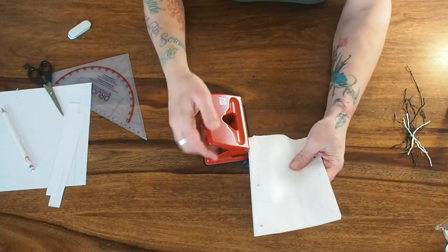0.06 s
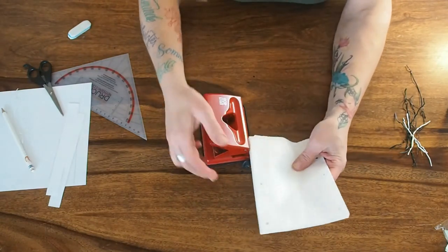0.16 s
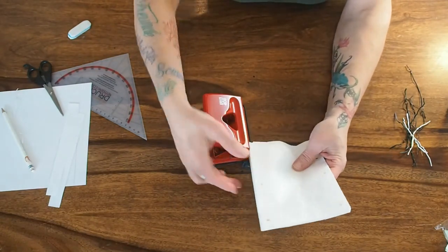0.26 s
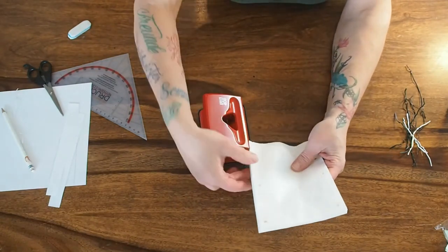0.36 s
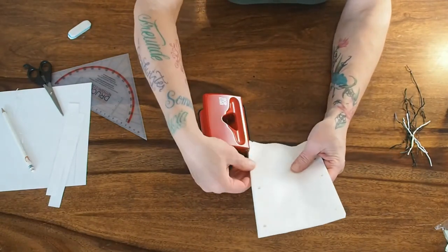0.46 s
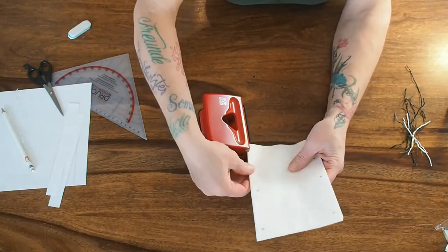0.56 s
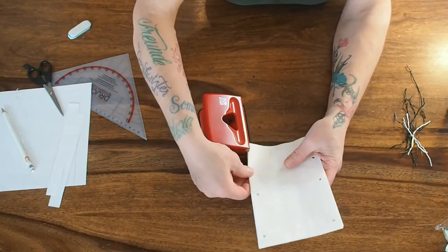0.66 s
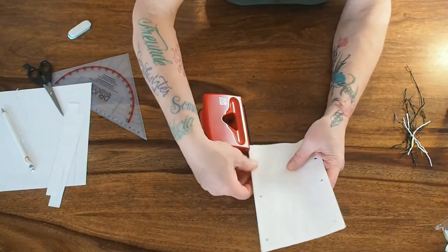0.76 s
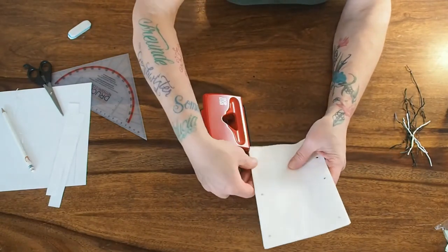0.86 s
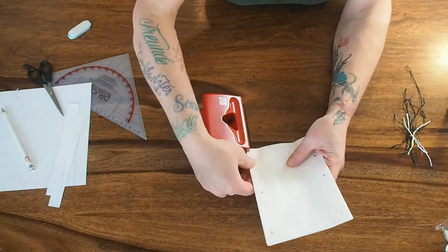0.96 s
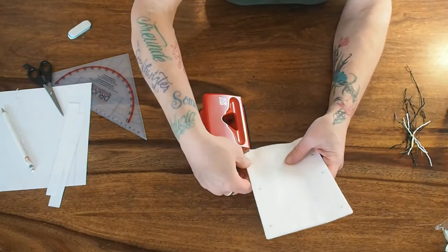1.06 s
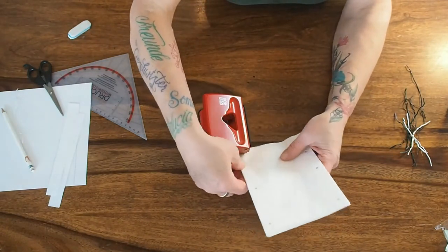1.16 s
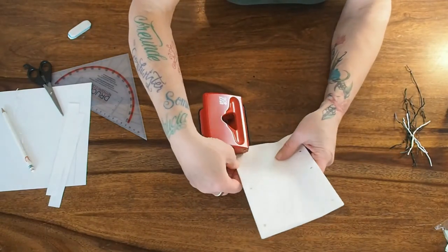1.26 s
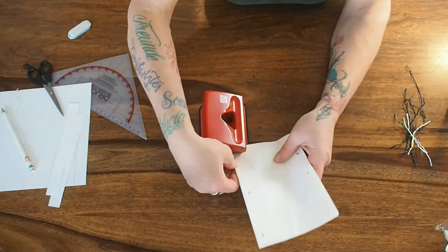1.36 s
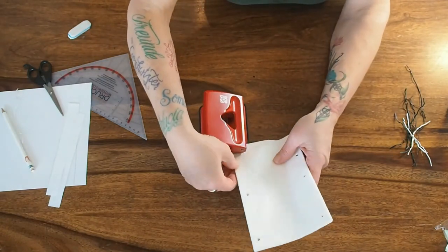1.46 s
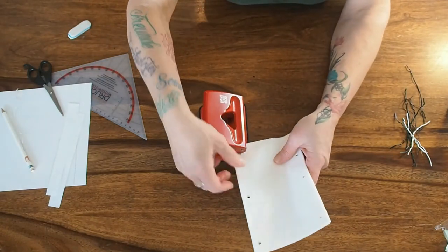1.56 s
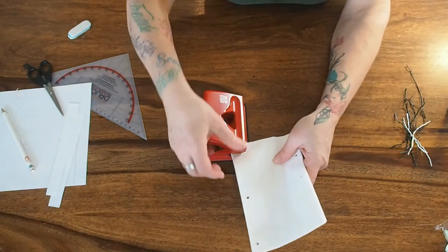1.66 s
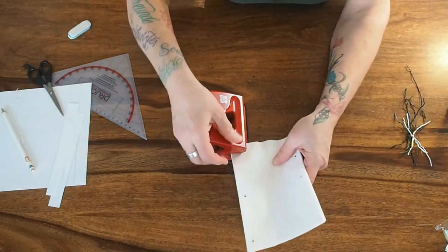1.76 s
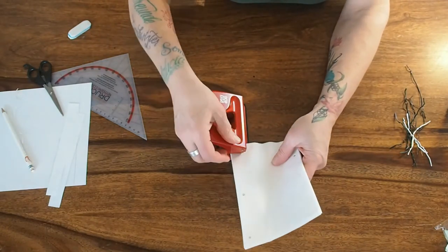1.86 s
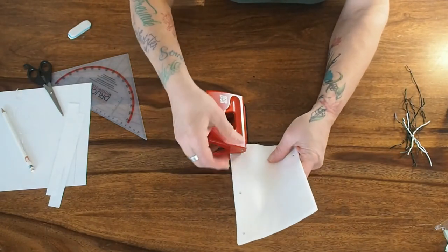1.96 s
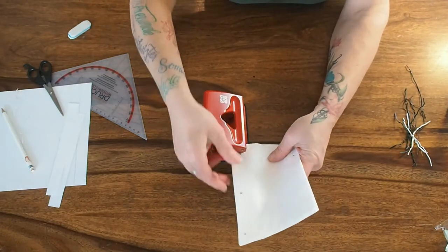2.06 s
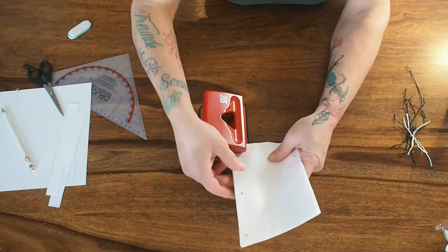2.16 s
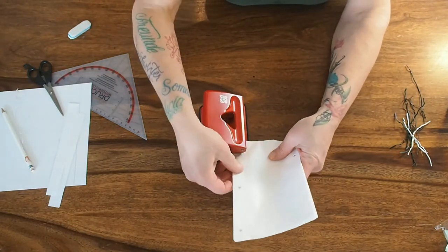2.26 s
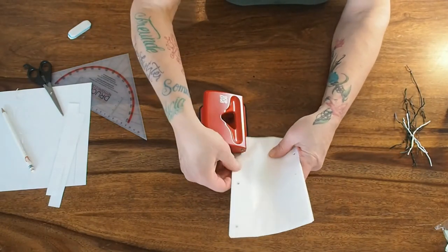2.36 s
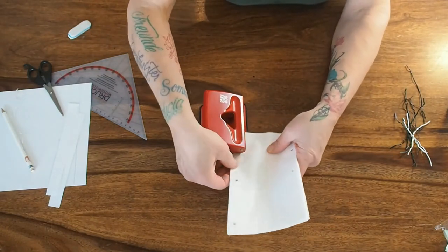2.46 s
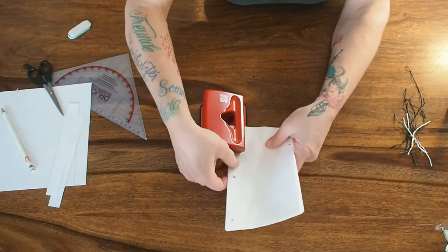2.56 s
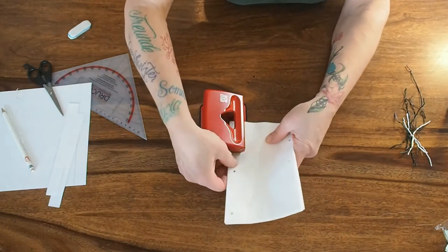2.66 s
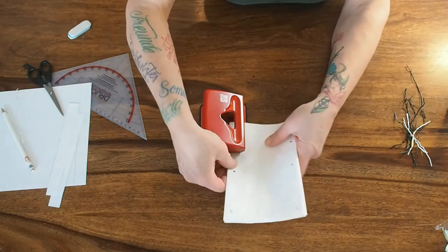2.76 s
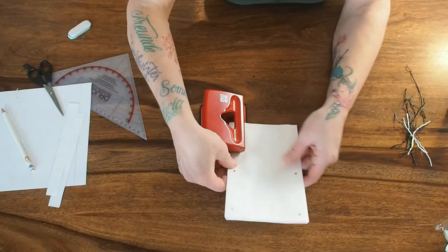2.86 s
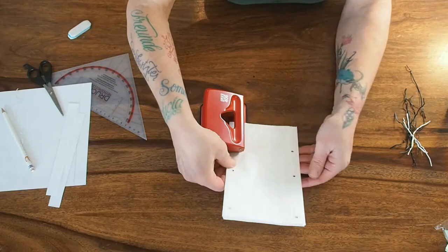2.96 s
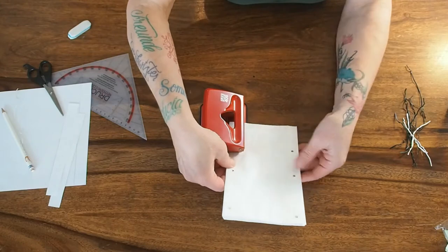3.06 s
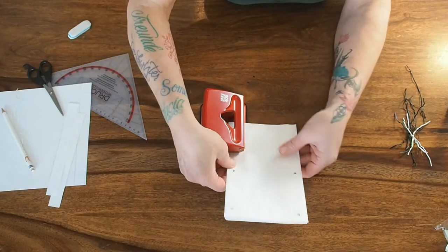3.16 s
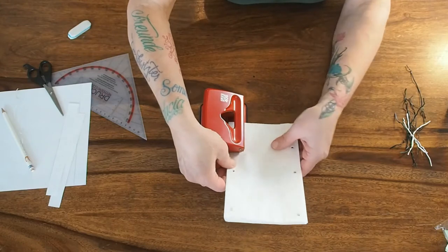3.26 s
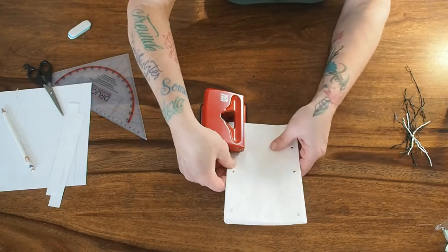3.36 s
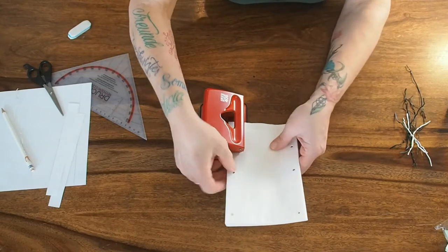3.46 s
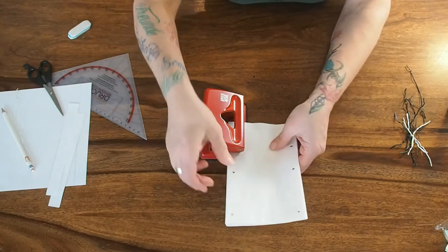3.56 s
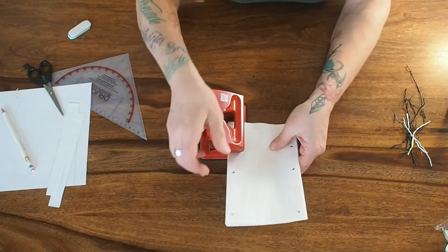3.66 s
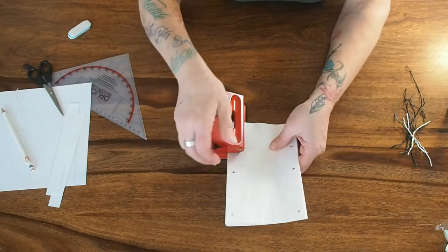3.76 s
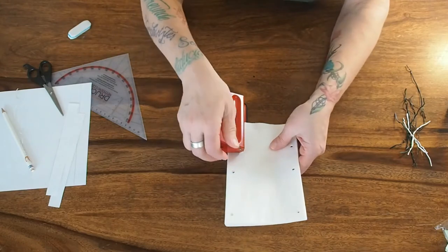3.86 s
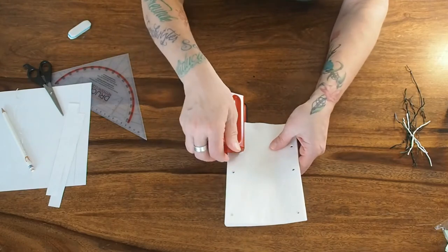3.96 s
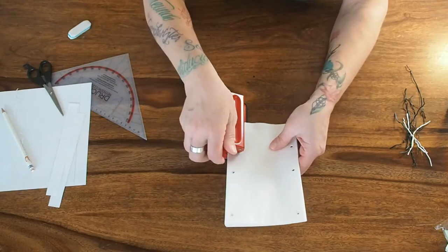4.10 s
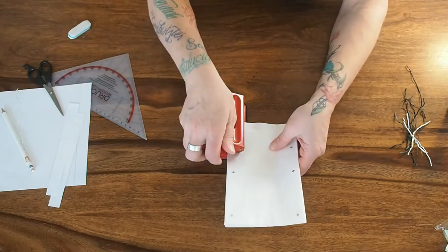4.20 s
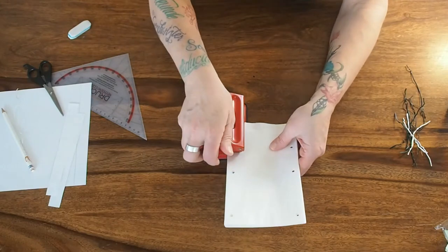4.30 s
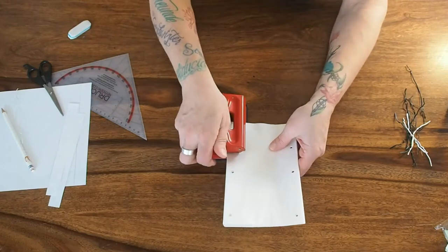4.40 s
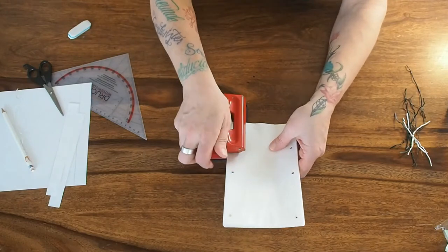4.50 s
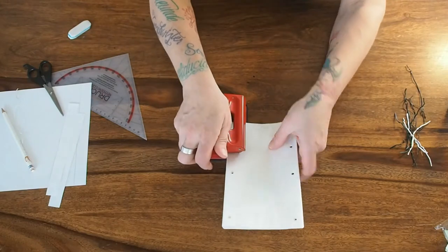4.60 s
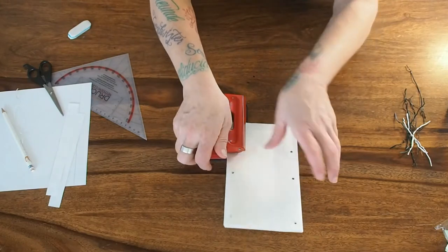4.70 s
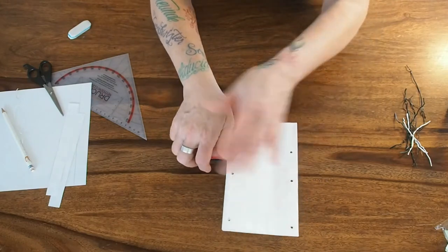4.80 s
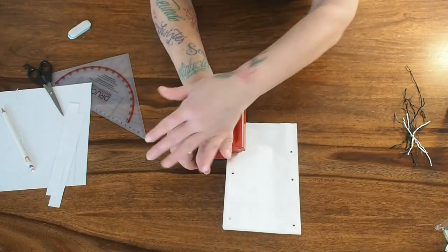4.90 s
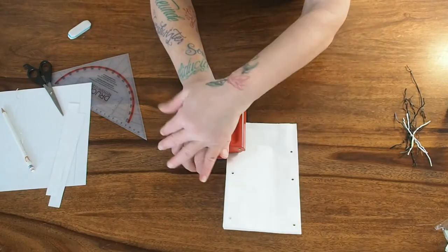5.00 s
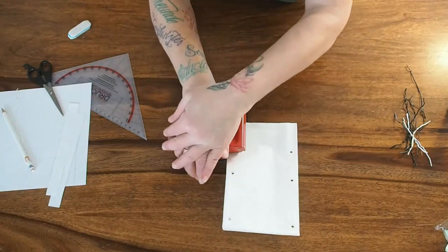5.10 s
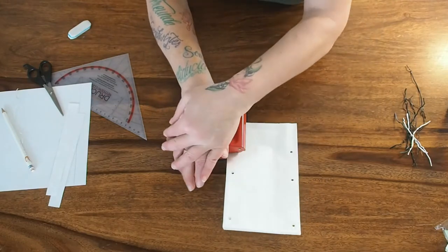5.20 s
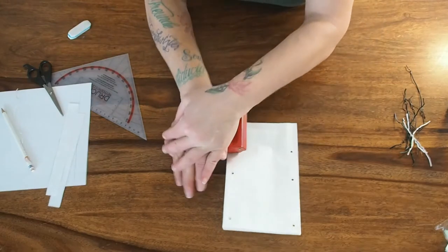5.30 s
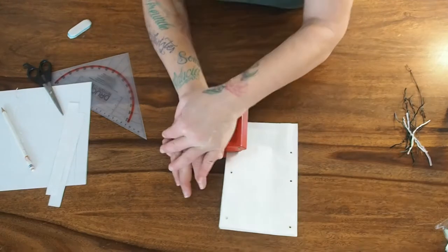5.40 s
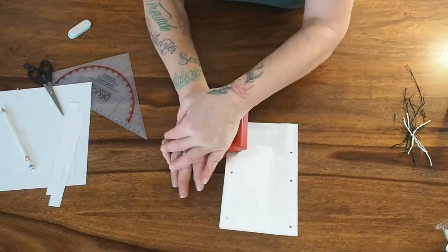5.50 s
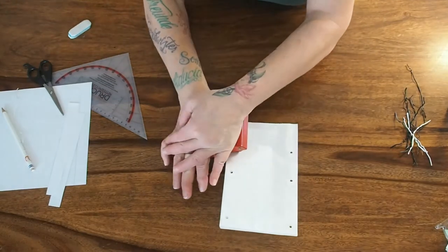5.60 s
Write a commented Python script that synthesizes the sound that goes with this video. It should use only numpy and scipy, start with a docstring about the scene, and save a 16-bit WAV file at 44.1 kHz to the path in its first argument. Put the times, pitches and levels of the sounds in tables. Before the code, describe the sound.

Thick paper rustles and ticks softly against a metal hole punch on a wooden table, then one very loud clack and short creaking end it.

```python
"""A metal hole punch on a wooden table, an arm's length from the microphone pair, takes a stack of paper bags.
Filtered noise with a fine random grain makes the paper rustle; short noise bursts tick at the guide.
Hands settle on the lever as soft low bursts; the pins break through with one loud clack of ringing modes
and noise, then creak down through the stack as a train of chirrs. A fairly live room with a faint
steady rush and hum answers with decaying stereo noise; the clack just overloads the microphone."""
import sys
import numpy as np
from scipy import signal
from scipy.fft import rfft, irfft, next_fast_len
from scipy.io import wavfile
from scipy.ndimage import map_coordinates

SR = 44100
rng = np.random.default_rng(int(sys.argv[2]) if len(sys.argv) > 2 else 0)


def wav_record(signal):
    """Record a signal, one row per channel, as 16-bit PCM in the file named by sys.argv[1]."""
    frames = np.transpose(np.atleast_2d(signal))
    bounded = np.clip(frames, -1, 1)
    # unit amplitude maps onto the largest positive 16-bit level
    quanta = np.round(bounded * 32767).astype(np.int16)
    wavfile.write(sys.argv[1], SR, quanta)


N = 248724  # length [samples]

# Steady rush of the room: (frequency [Hz], relative level [dB])
RUSH_SPECTRUM = [(20, -14), (50, -4.5), (145, -.5), (255, -4), (330, -11.5), (750, -11.5), (1080, -7.5),
                 (1300, -8.5), (1480, -16.5), (2500, -23), (4200, -21), (6800, -29), (10500, -25),
                 (16000, -30.5)]
# Faint hum, swelling a little before the press: (time [s], level [dB])
HUM_LEVEL = [(3.2, -76), (3.9, -66), (4.8, -65.5)]
RUSH_DB, HUM_HZ = -56, 139.4

# Paper rubbing, and its high hiss: (frequency [Hz], relative level [dB])
RUB_SPECTRUM = [(200, -24), (500, 4), (900, -6.5), (1400, -6), (1800, 4), (2300, -7), (3000, 0.5),
                (4600, 0.5), (5700, -11), (8000, -31), (16000, -48)]
HISS_SPECTRUM = [(2000, -31), (5000, -7), (7000, -6.5), (10000, -4.5), (12500, -6), (15000, -11),
                 (16500, -30)]
# Pushes of the stack over the table: (time of peak [s], width [s], rub level [dB], hiss re rub [dB])
PUSHES = [(0.06, 0.066, -60, -4), (0.436, 0.027, -57.5, 1), (0.706, 0.022, -54, -4),
          (1.03, 0.027, -57, -0.5), (1.164, 0.047, -54, -0.5), (1.43, 0.03, -59, 1.5),
          (1.575, 0.05, -61.5, -0.5), (1.85, 0.055, -57.5, -1), (2.18, 0.035, -53.5, 0),
          (2.305, 0.047, -53.5, -1.5), (2.466, 0.037, -53, -1), (2.574, 0.043, -53, -4.5),
          (2.729, 0.055, -58, 0), (3.25, 0.061, -58, -8), (4.53, .09, -64, -3.5)]
# The stack shifting between pushes: (time [s], rub level before its flutter [dB])
SHUFFLE_LEVEL = [(0, -59.5), (0.3, -70), (0.85, -61), (1.3, -61.5), (1.65, -65), (2.95, -71), (3.12, -62.5),
                 (3.38, -64), (3.5, -72)]
PUSH_RISE, PUSH_FALL = 1, 1.17  # a push starts faster than it stops: factors on its width
SHUFFLE_HISS_DB = -3.5  # re its rub

# Edges and fingers on the punch:
# (time [s], level before trim [dB], knock re tick [dB], snap re tick [dB])
CONTACTS = [(0.181, -48.5, 10, -15), (0.4317, -36, -11, 4.5), (0.4397, -36.5, -7, 3), (1.4009, -46.5, 7, 3),
            (1.48, -41.5, 7.5, -11), (1.5684, -33.5, -29, 4), (1.683, -43.5, 6.5, 10.5),
            (1.813, -38.5, -6, -2), (1.8358, -44.5, 0, 3), (2.1224, -38, -8, -4), (2.15, -30.5, -0.5, 3),
            (2.3033, -26.5, -5.5, -3), (2.4872, -43.5, -2, 10.5), (2.538, -46, 11.5, -11),
            (3.269, -34, -7, -6), (3.3186, -36, -20, -7), (4.304, -48.5, 2, 13), (4.475, -34.5, -11, 0.5)]
# Knock of the punch, tick of the stack, snap of a sheet's edge: (frequency [Hz], relative level [dB])
KNOCK_SPECTRUM = [(60, -45), (500, -21), (900, 18.5), (1350, 13), (2100, 1.5), (2900, -31), (6000, -38),
                  (12000, -70)]
TICK_SPECTRUM = [(1000, -32), (2000, 1), (2700, 0.5), (3700, 4.5), (5000, 5.5), (7500, -29), (14000, -26)]
SNAP_SPECTRUM = [(3000, -6), (6500, -7), (10000, -3), (14000, -5.5), (17000, -25)]
TICK_T60_S = 0.024
STRAY_PER_S, STRAY_OVER_RUB_DB, STRAY_SPREAD_DB = 6, 19, 1  # faint ticks: rate, level before trim, scatter

# Hands bumping the lever and the table: (time [s], level before trim [dB])
HAND_BUMPS = [(0.882, -46), (4.314, -41.5), (4.327, -38), (4.88, -41.5), (4.965, -42.5)]
# Dull colour of a bump: (frequency [Hz], relative level [dB])
BUMP_SPECTRUM = [(30, -45), (90, -1), (140, -4), (240, -3.5), (340, -10.5), (520, -14), (900, -33),
                 (3000, -32), (8000, -90)]
BUMP_T60_S = 0.12

# Pins break through, lever hits its stop, base slams the table:
# (time [s], steel before trim [dB], crack [dB], wood [dB])
BLOWS = [(5.2209, 0.5, -10, -20), (5.2453, -11, -14.5, -27.5), (5.2573, -23, -17, -16.5)]
# Modes of the steel frame: (frequency [Hz], relative level [dB], decay by 60 dB [s])
FRAME_MODES = [(1020, -6, 0.013), (1480, -7.5, 0.0051), (1624, -14.5, 0.013), (2180, -32, 0.029),
               (3210, 3, 0.0032), (3840, 2, 0.0023), (4750, -13, 0.0095), (5940, -4, 0.0024)]
# Modes of the punch on the table top: (frequency [Hz], relative level [dB], decay by 60 dB [s])
TABLE_MODES = [(92.8, -12.5, 0.81), (121.5, -1, 0.35), (205.6, 1, 0.26), (238.3, -9.5, 0.48),
               (335, -5, 0.13), (463, -16, 0.41), (479, 0.5, 0.2), (781, -11, 0.72), (920, -18, 0.27),
               (1080, -14, 0.2)]
# Crack of a blow, thud of the table, the clack as it fills the room: (frequency [Hz], relative level [dB])
CRACK_SPECTRUM = [(100, -43), (550, -12), (1000, 9), (3500, 8), (6000, -7.5), (10000, -2.5), (14000, -11),
                  (17000, -22)]
THUD_SPECTRUM = [(20, -35), (55, -13), (80, -10), (125, -4), (220, -12), (300, 7), (450, 9), (700, -28),
                 (1100, -19), (2000, -4.5), (5000, -32), (12000, -55)]
BOOM_SPECTRUM = [(25, -4), (60, -16), (100, -13.5), (160, -6.5), (210, 4), (340, -3.5), (480, -1.5),
                 (720, -6), (1150, -4), (1600, -11.5), (2200, -14), (3500, -19), (4500, -20), (7000, -28.5),
                 (11000, -25), (16000, -35)]

# Runs in which the pins stick and slip in the paper:
# (start time [s], length [s], first gap [s], first level before scatter and trim [dB], low share before trim [dB])
CREAK_RUNS = [(5.278, 0.022, 0.017, -9.5, -21), (5.322, 0.045, 0.012, -18.5, -2),
              (5.3982, 0.058, 0.014, -17, -4), (5.477, 0.01, 0.0061, -27, -16)]
# Weak slips fading as the pins come free: (time [s], level before scatter and trim [dB])
CHATTER_LEVEL = [(5.27, -26), (5.36, -24), (5.4, -55), (5.5, -62)]
# High chirr and lower resonance of a slip: (frequency [Hz], relative level [dB])
CREAK_SPECTRUM = [(4000, -14), (7500, -8.5), (9500, -0.5), (11500, 5), (13500, -2), (16000, -14)]
LOW_CREAK_SPECTRUM = [(2500, -35), (4500, -8), (5800, -2), (7200, -14), (11000, -28)]
CHATTER_SPAN_S, CHATTER_PER_S = (5.265, 5.5), 130
GAP_GROWTH, EASE_DB_PER_S, SLIP_SPREAD_DB = 1.15, 72, 2.5  # a run slows and weakens; sizes scatter

# Decay of the room by 60 dB: (frequency [Hz], time [s])
ROOM_T60 = [(80, 1), (200, 0.68), (500, 0.67), (1200, 0.62), (3000, 0.64), (7000, 0.45), (15000, 0.13)]
# A small sound as it fills the room: (frequency [Hz], relative level [dB])
ROOM_SPECTRUM = [(60, 14), (200, -0.5), (1000, 5), (2000, 5), (3500, 3), (7000, 3.5), (15000, 8)]
# Left-right likeness of near sounds, and of the room: (frequency [Hz], correlation [-1 to 1])
NEAR_LIKENESS = [(60, 1), (300, 0.9), (1000, 0.96), (2500, 0.5), (5000, 0.4), (12000, 0.28)]
ROOM_LIKENESS = [(60, 0.58), (290, 0.72), (640, 0.69), (1400, 0.43), (3100, 0.2), (12000, 0.051)]
# Balance of the microphone pair: (frequency [Hz], left over right [dB])
PAIR_LEAN = [(60, 1), (250, 1.5), (700, 5.5), (1300, 4), (2400, 0.8), (4400, 1.6), (8000, 0.1),
             (15000, -1.8)]
TOP_HZ, TOP_SLOPE_HZ = 16300, 600  # band limit and width of the slope below it


def amp(db):
    """Decibels to gain."""
    return 10 ** (np.asarray(db) / 20)


def unit(x):
    """Scale to rms 1."""
    return x / np.sqrt(np.mean(x ** 2) + 1e-20)


def along(points, hz):
    """Read (frequency, value) points on a log axis."""
    f, v = np.transpose(points)
    return np.interp(np.log(hz + 1), np.log(f + 1), v)


def fade(t, t60):
    """Exponential decay, 60 dB down at t60."""
    return np.exp(-np.log(1000) * t / t60)


def wobble(rate):
    """A smooth random curve, rate knots a second."""
    knots = rng.standard_normal(int(N * rate / SR) + 4)
    return map_coordinates(knots, [np.arange(N) * rate / SR])


def noise(spectrum, size, likeness=NEAR_LIKENESS):
    """Coloured stereo noise of rms 1; mid and side shares set the left-right likeness."""
    hz = np.fft.rfftfreq(size, 1 / SR)
    turn = np.arccos(np.clip(along(likeness, hz), -1, 1)) / 2
    white = rfft(rng.standard_normal((2, size)))
    shares = [np.cos(turn), np.sin(turn)]
    mid, side = irfft(white * amp(along(spectrum, hz)) * shares, size)
    return unit(np.array([mid + side, mid - side]))


def burst(spectrum, envelope):
    """A puff of coloured noise with the energy of its envelope."""
    puff = unit(noise(spectrum, len(envelope)) * envelope)
    return puff * np.sqrt(np.mean(envelope ** 2))


def add(track, s, sound):
    """Mix a sound into the track at s seconds, cut at the track's end."""
    part = track[:, round(s * SR):][:, :sound.shape[-1]]
    part += sound[..., :part.shape[1]]


def room_rush():
    """The low steady rush of the room, with a faint band near one kilohertz."""
    return amp(RUSH_DB) * noise(RUSH_SPECTRUM, N, ROOM_LIKENESS)


def room_hum():
    """A faint low sine whose phase wavers while its level follows a slow curve."""
    t = np.arange(N) / SR
    tone = np.sin(2 * np.pi * HUM_HZ * t + 0.85 * wobble(9.7))
    return amp(np.interp(t, *np.transpose(HUM_LEVEL))) * unit(tone)


def paper_motion():
    """Gains of rub and hiss as the stack moves: pushes that swell and die over an unsteady shuffle."""
    t = np.arange(N) / SR
    rub = amp(np.interp(t, *np.transpose(SHUFFLE_LEVEL)) + 0.53 * wobble(13))
    hiss = rub * amp(SHUFFLE_HISS_DB)
    for s, width, db, hiss_db in PUSHES:
        side_width = width * np.where(t < s, PUSH_RISE, PUSH_FALL)
        widths_away = np.abs(t - s) / side_width
        push = amp(db) * np.exp(-.5 * np.minimum(widths_away, 10) ** 2)
        rub = np.maximum(rub, push)
        hiss = np.maximum(hiss, amp(hiss_db) * push)
    return rub, hiss


def sliding_paper(rub, hiss, grain_db=2.0, flutter_db=1.34):
    """Fibres catch and let go, so rub and hiss share one fine grain."""
    grain = unit(amp(grain_db * wobble(1400) + flutter_db * wobble(60)))
    return grain * (rub * noise(RUB_SPECTRUM, N) + hiss * noise(HISS_SPECTRUM, N))


def stray_ticks(rub, snap_db=-3, colour_spread_db=2.5, loudest_db=-42):
    """Faint contacts at random moments, stronger while the stack rubs harder; rows as in CONTACTS."""
    rows = []
    for start in np.arange(0, N / SR, 1 / STRAY_PER_S):
        s = start + rng.random() / STRAY_PER_S
        size, knock, snap = rng.standard_normal(3)
        rub_db = 20 * np.log10(rub[min(int(s * SR), N - 1)])
        db = min(rub_db + STRAY_OVER_RUB_DB + STRAY_SPREAD_DB * size, loudest_db)
        rows.append((s, db, colour_spread_db * knock, snap_db + colour_spread_db * snap))
    return rows


def paper_ticks(contacts, trim_db=-7):
    """Each contact mixes a knock of the punch, a tick of the stack and a snap of the sheet's edge."""
    out, t = np.zeros((2, N)), np.arange(SR // 10) / SR
    strike = fade(t, TICK_T60_S) * (1 - np.exp(-t / 0.000057))
    for s, db, knock_db, snap_db in contacts:
        level = db + trim_db
        knock = amp(level + knock_db) * burst(KNOCK_SPECTRUM, strike)
        tick = amp(level) * burst(TICK_SPECTRUM, strike)
        snap = amp(level + snap_db) * burst(SNAP_SPECTRUM, strike)
        add(out, s + .0005, knock + tick + snap)  # half a millisecond after the row's time
    return out


def room_tail(colour, build):
    """Diffuse answer of the walls, its mono energy 1: it builds up, then the treble dies first."""
    hz, t, z = signal.stft(noise(colour, SR, ROOM_LIKENESS), SR, nperseg=256)
    decay = fade(t, along(ROOM_T60, hz)[:, None])
    tail = signal.istft(z * decay, SR, nperseg=256)[1]
    tail = tail * (1 - np.exp(-np.arange(tail.shape[1]) / SR / build))
    return tail / np.linalg.norm(tail.mean(axis=0))


def room(x):
    """A small sound, summed to mono and scattered by the walls."""
    tail = room_tail(ROOM_SPECTRUM, build=0.0038)
    return signal.fftconvolve(x.mean(axis=0)[None], tail, axes=1)[:, :N]


def hand_bumps(trim_db=-3):
    """Soft flesh on the lever gives only dull thumps."""
    out, t = np.zeros((2, N)), np.arange(SR // 4) / SR
    onset = 1 - np.exp(-(t / .003) ** 2)
    for s, db in HAND_BUMPS:
        add(out, s, amp(db + trim_db) * burst(BUMP_SPECTRUM, fade(t, BUMP_T60_S) * onset))
    return out


def ring(modes, t):
    """Struck modes, each a dying cosine; neighbours swing in opposite directions."""
    total = 0
    for k, (hz, db, t60) in enumerate(modes):
        total = total + (-1) ** k * amp(db) * fade(t, t60) * np.cos(2 * np.pi * hz * t)
    return total


def punch_clack(frame_db=2, table_db=-1, thud_db=-3, boom_db=15.0):
    """Each blow cracks the steel frame and rings the table top; one room boom starts with the first."""
    out, t = np.zeros((2, N)), np.arange(SR // 2) / SR
    for s, steel_db, crack_db, wood_db in BLOWS:
        steel = amp(steel_db + frame_db) * ring(FRAME_MODES, t)
        crack = amp(crack_db) * burst(CRACK_SPECTRUM, fade(t, 0.02))
        wood = amp(table_db) * ring(TABLE_MODES, t) + amp(thud_db) * burst(THUD_SPECTRUM, fade(t, 0.082))
        wood = wood * (1 - np.exp(-t / 0.003))  # the heavy top takes a moment to move
        add(out, s, steel + crack + amp(wood_db) * wood)
    add(out, BLOWS[0][0], amp(boom_db) * room_tail(BOOM_SPECTRUM, build=0.016))
    return out


def slips(chatter_low_db=-14, chatter_spread_db=3):
    """Stick and slip: slowing, weakening runs among faint irregular slips; rows of (time, level, low share)."""
    rows = []
    for start, length, gap, first_db, low_db in CREAK_RUNS:
        age = 0
        while age < length:
            db = first_db - EASE_DB_PER_S * age + SLIP_SPREAD_DB * rng.standard_normal()
            rows.append((start + age, db, low_db))
            age += gap
            gap *= GAP_GROWTH
    for s in np.arange(*CHATTER_SPAN_S, 1 / CHATTER_PER_S):
        db = np.interp(s, *np.transpose(CHATTER_LEVEL)) + chatter_spread_db * rng.standard_normal()
        rows.append((s + rng.random() / CHATTER_PER_S, db, chatter_low_db))
    return rows


def pin_creak(high_db=-6, low_db=-12, swell_s=0.0013, pan_db=-1.0):
    """Every slip is a short chirr that swells and dies, with its own share of the lower resonance."""
    out, t = np.zeros((2, N)), np.arange(SR // 20) / SR
    chirr = (t / swell_s) ** 2 * np.exp(2 * (1 - t / swell_s))
    pan = amp([[pan_db / 2], [-pan_db / 2]])  # left, right
    for s, db, share_db in slips():
        # unrelated at the two microphones
        high = pan * np.array([burst(CREAK_SPECTRUM, chirr)[0], burst(CREAK_SPECTRUM, chirr)[1]])
        low = burst(LOW_CREAK_SPECTRUM, chirr)
        add(out, s, amp(db) * (amp(high_db) * high + amp(low_db + share_db) * low))
    return out


def scene(handling_wet_db=-6, creak_wet_db=-18):
    """Everything happens on the table, an arm's length from the microphone."""
    air = room_rush() + room_hum()
    rub, hiss = paper_motion()
    rustle = sliding_paper(rub, hiss)
    handling = paper_ticks(CONTACTS) + paper_ticks(stray_ticks(rub)) + hand_bumps()
    clack = punch_clack()
    creak = pin_creak()
    walls = room(amp(handling_wet_db) * handling + amp(creak_wet_db) * creak)
    return air + rustle + handling + clack + creak + walls


def record(dry, low_cut_hz=30):
    """The microphone pair leans left below the top treble, sheds deep bass, clips and is band-limited."""
    size = next_fast_len(N + SR // 4)
    hz = np.fft.rfftfreq(size, 1 / SR)
    lean = amp(np.outer([.5, -.5], along(PAIR_LEAN, hz)))
    leaning = irfft(rfft(dry, size) * lean, size)
    low_cut = signal.butter(2, low_cut_hz, "high", fs=SR, output="sos")
    clipped = np.clip(signal.sosfilt(low_cut, leaning), -1, 1)
    band = np.clip((TOP_HZ - hz) / TOP_SLOPE_HZ, 0, 1)
    return irfft(rfft(clipped) * band, size)[:, :N]


dry = scene()
out = record(dry)
wav_record(out)
```